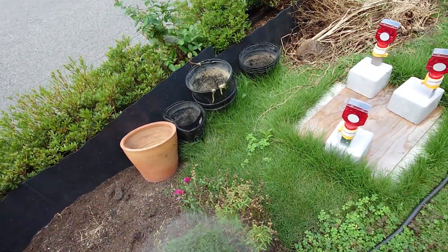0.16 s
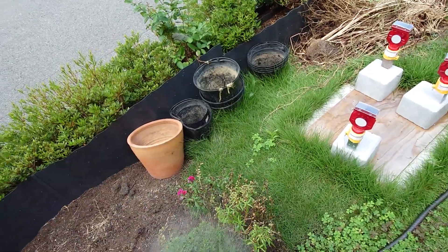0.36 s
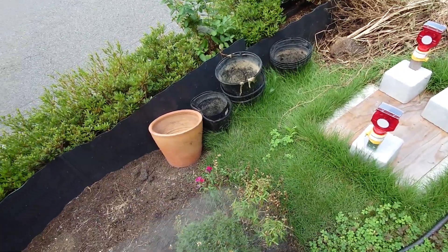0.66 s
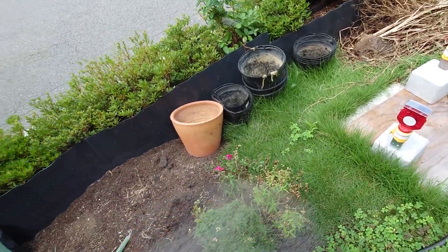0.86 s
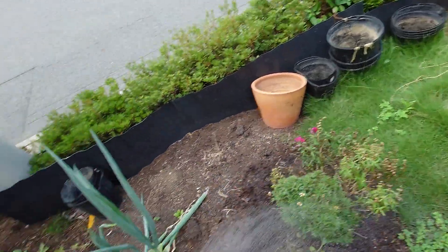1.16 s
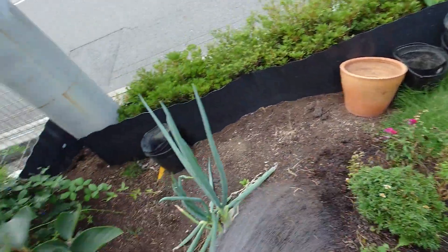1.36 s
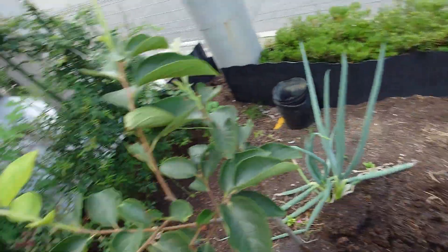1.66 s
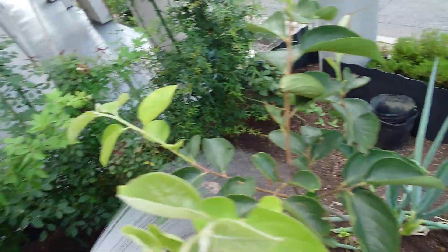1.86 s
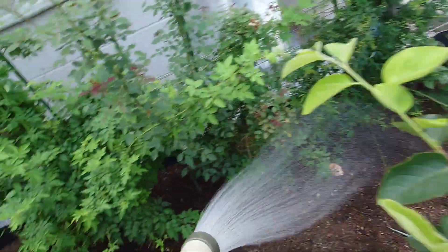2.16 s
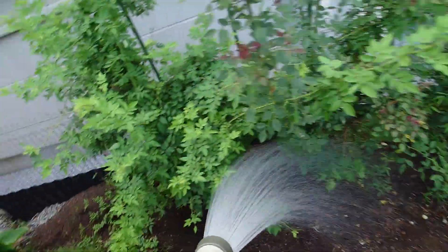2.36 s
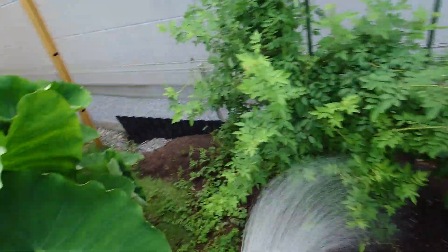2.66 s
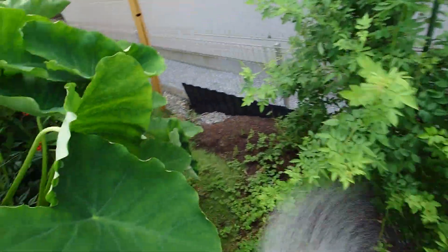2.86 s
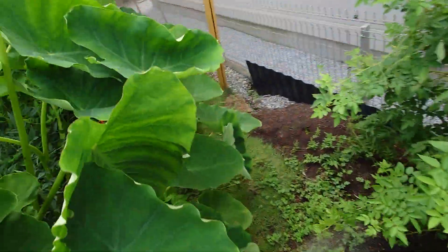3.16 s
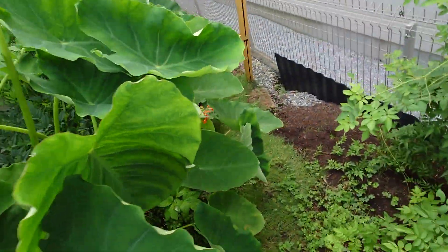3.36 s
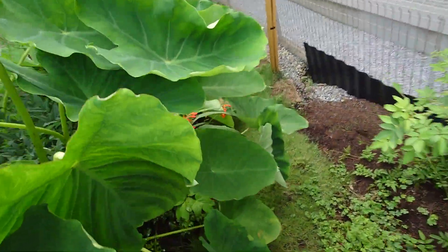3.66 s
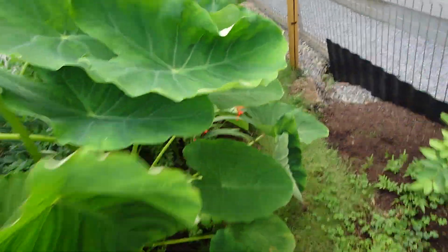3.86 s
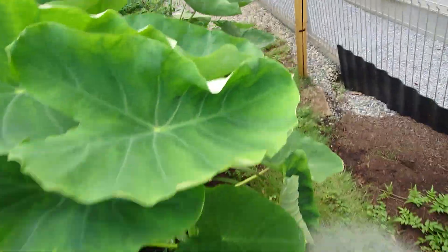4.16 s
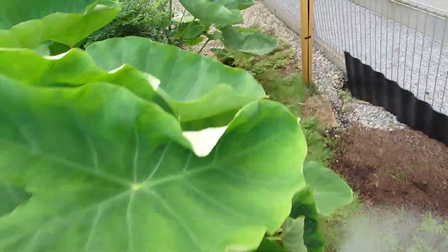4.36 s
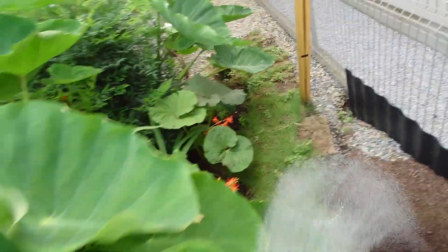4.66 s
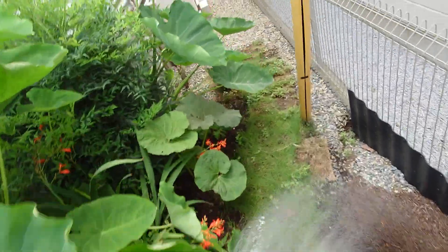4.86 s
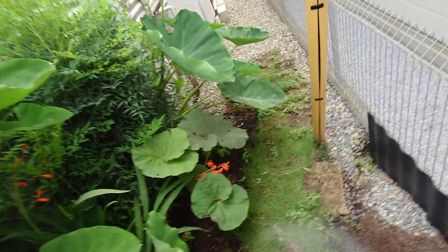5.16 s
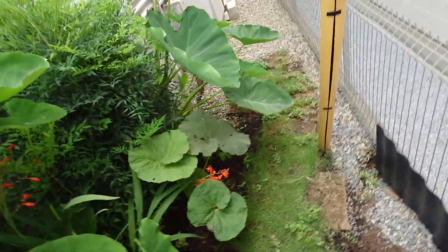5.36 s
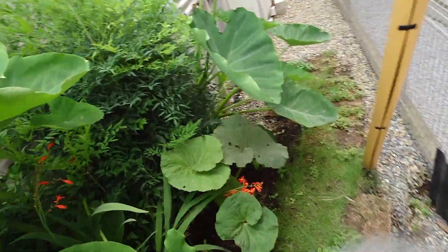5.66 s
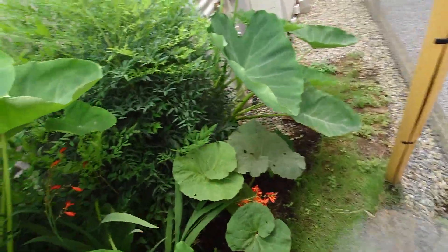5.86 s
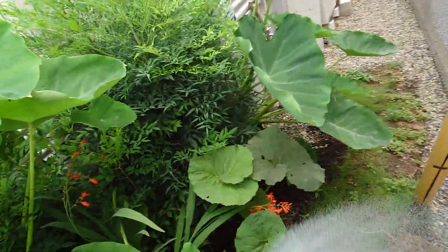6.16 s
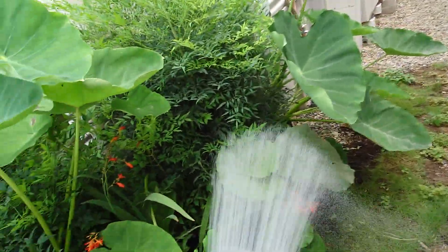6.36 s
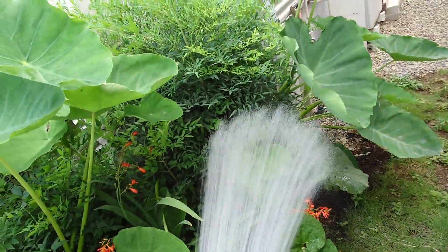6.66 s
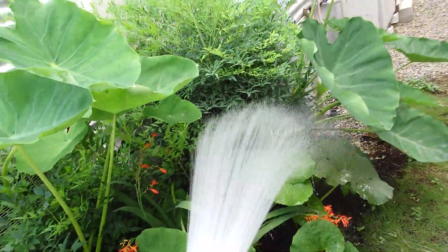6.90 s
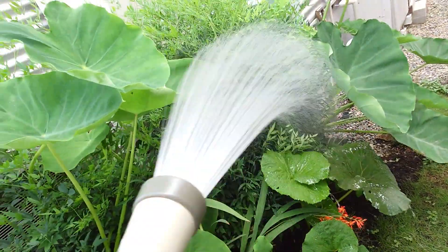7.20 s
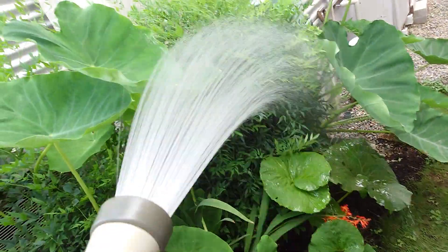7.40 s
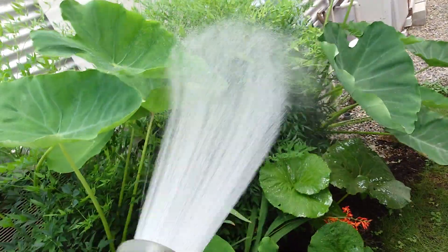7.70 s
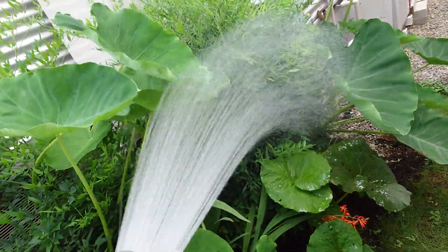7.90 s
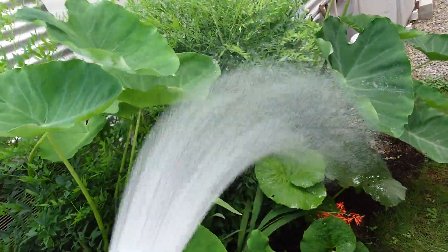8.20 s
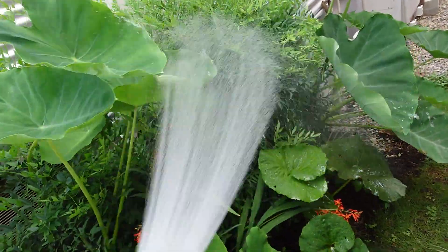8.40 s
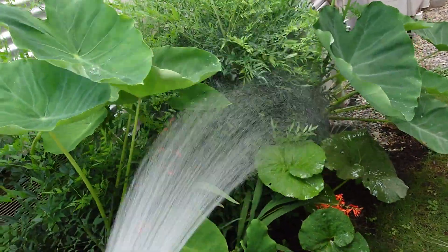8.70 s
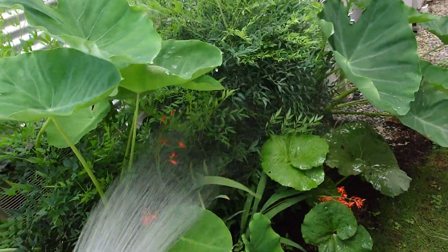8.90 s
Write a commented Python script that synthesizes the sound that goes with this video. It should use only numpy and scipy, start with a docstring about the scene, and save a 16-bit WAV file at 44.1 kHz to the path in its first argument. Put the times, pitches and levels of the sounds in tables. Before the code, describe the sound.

Water sprays from a hose onto soil and big leaves, whistling and drumming louder as it sweeps, while wind puffs and a bird chirps occasionally.

```python
"""A shower nozzle on a garden hose sweeps over soil and broad leaves, close to two microphone ports.
From the start the nozzle whistles and hisses, drops drum on soil and mist fizzes over far traffic; a bird
chirps now and then and fat drops tick. From 2 s wind puffs on the ports and low plops join in. From 3.4 s
the spray crosses the leaves in louder passes, and the wind slaps around 4 and 5 s. A faint hum then comes
and goes twice, and the mist is strongest at the end."""
import sys
import numpy as np
from scipy import signal
from scipy.fft import rfft, irfft, next_fast_len
from scipy.io import wavfile
from scipy.ndimage import uniform_filter1d

SR = 44100
rng = np.random.default_rng(int(sys.argv[2]) if len(sys.argv) > 2 else 0)


def waveform_to_disk(signal):
    """Save audio, clipped to [-1, 1], as 16-bit WAV at the path in sys.argv[1]."""
    frames = np.transpose(np.atleast_2d(signal))
    scaled = np.clip(frames, -1, 1) * 32767
    samples = np.round(scaled).astype(np.int16)
    wavfile.write(sys.argv[1], SR, samples)


N = 398663
CLOCK_S = np.arange(0, N / SR + .002, .002)  # control clock for all envelopes

# The low ring, near 1.1 kHz, swells and fades in the water drumming on the soil; the others shift as the
# hand turns the nozzle: time_s, main_ring_hz, low_ring_db, upper_ring_db, high_ring_db
RINGS = [(0, 2400, 11, 2, -1), (.5, 2370, 14, 8, -8), (.9, 2450, 7, 2, -6), (1.35, 2440, 9, 1, 4),
         (1.7, 2400, 6, 1, 3), (2, 2400, 12, 4.2, 5), (2.3, 2320, -10, 1, -4), (2.7, 2330, 10, 1, -7),
         (2.95, 2470, 3, 13, 4), (3.3, 2550, 0, 4.1, 8), (3.9, 2280, -10, 1, -1), (4.15, 2430, -4, 1, 5),
         (5.2, 2400, -0.5, 1, 2), (5.6, 2310, 2, 3, -1), (5.95, 2260, 6, 2.2, -2), (6.25, 2370, 1, 10, 6),
         (6.45, 2210, 4, 1, -6), (6.95, 2200, -9, 1, 4), (7.2, 2280, 0, 2, 0), (7.8, 2390, -9, 5.1, -3),
         (8.5, 2350, -1.5, 1, 3), (9.04, 2580, 0, 1, -10)]


def nozzle():
    """Turbulence in the shower head rings its chamber and hisses through the holes."""
    # Nozzle faders (pan is always left minus right): time_s, whistle_db, whistle_pan_db, hiss_db, hiss_pan_db
    faders = [(0, -52.5, -8, -58, 15), (.25, -48, -9.5, -52.5, 18), (1, -50, -8.5, -54, 17),
              (1.3, -49.5, -11, -54, 12.5), (1.8, -49, -10, -53.5, 10.5), (2.15, -52.5, -1, -51, 11),
              (2.59, -46.5, -4, -48, 12), (2.9, -50, -7.5, -52.5, 8.5), (3.5, -50, -5.5, -55, 4.5),
              (4.1, -47, -7, -50.5, 8), (4.35, -45.5, -10, -52, 7), (4.85, -43, -7.5, -48.5, 9),
              (5.15, -47, -6.5, -53, 7.5), (5.37, -46.5, -8, -53.5, 8), (5.76, -44.5, -11, -52.5, 7.5),
              (6.3, -45, -8.5, -51.5, 5.5), (6.5, -48.5, -11, -49, 7), (7.2, -48.5, -1.5, -48, 10),
              (7.85, -44.5, 0.5, -45.5, 11.5), (8.2, -52, -1, -49, 7), (8.35, -44, -7, -48, 9),
              (9.04, -46, -6, -47, 10.5)]
    # Chamber tone: frequency_hz, left_db, right_db
    whistle_eq = [(1090, -25, -35.5), (1940, 0, -4), (2220, -6, 0), (2350, 2, -1.5), (2580, 1, -3),
                  (2660, 3.5, -13.5), (3040, 0, -9), (3510, 0.5, -16.5), (3960, -31, -20.5),
                  (4860, -50, -66)]
    # Tone of the holes: frequency_hz, left_db, right_db
    hiss_eq = [(3180, -29, -32), (4600, -6, -23), (4880, -10, -8.5), (5230, 0, 2.5), (5370, -2.5, -17),
               (6200, 3, -13), (6410, 5, 3), (6530, 3, 3.5), (7456, 5, 1), (7940, -44, 3),
               (8460, -10, -5.5), (8550, -22, -4.5), (10060, -19, -22.5)]
    whistle_db, whistle_pan_db, hiss_db, hiss_pan_db = curves(faders)
    time_s, main_hz = np.transpose(RINGS)[:2]

    def chamber_db(hz, t):
        detune_hz = hz[:, None] - np.interp(t, time_s, main_hz)
        return 7.5 * np.exp(-(detune_hz / 140) ** 2) + side_rings(hz, t)

    whistle = coloured(noise(), whistle_eq, (2100, 2700), 0.84, chamber_db, bearing="nozzle")
    hiss = coloured(noise(), hiss_eq, (5000, 7500), 1.08, side_rings, bearing="nozzle")
    whistle *= to_samples(placed(whistle_db - 6.5, whistle_pan_db) * surge("whistle") * waver(1.43, 12))
    hiss *= to_samples(placed(hiss_db, hiss_pan_db) * surge("hiss") * waver(0.95, 12))
    return whistle + hiss


def leaves():
    """Dense drops drum on soil and leaves; large leaves add bass."""
    # Spray on soil and small plants: time_s, level_db, pan_db, bass_db
    soil = [(0, -64, 2, 8), (.5, -61.5, -1, 2.5), (1.05, -58, 0, -1), (1.35, -62.5, -2.5, 4.5),
            (1.8, -70.5, -2, 21), (2.15, -63, -4, 8), (2.7, -63.5, -2.5, 7.5), (3.2, -60.5, -1.5, 2),
            (4.3, -59.5, -4, 2.5), (5.3, -62, -1.5, 17.5), (5.7, -54, -2.5, 0.5), (6, -51.5, -4.5, -1.5),
            (6.3, -55, -3, -5), (7.3, -54.5, -4.5, -3.5), (8, -56, -4, 6.5), (9.04, -54, -1, -7)]
    # Spray crossing broad leaves: start_s, end_s, start_db, end_db, pan_db, rise_s, fall_s, bass_db
    passes = [(3.386, 3.504, -47.5, -48.5, -2.5, 0.11, 0.083, 1),
              (3.714, 3.873, -44.5, -45.5, -3.5, 0.15, .03, -1),
              (3.902, 3.994, -41.5, -44, -3, .02, 0.24, 0.5),
              (4.582, 4.762, -47.5, -48, -3.5, 0.085, .05, -4.5),
              (4.81, 5.04, -44.5, -45, -3.5, 0.075, 0.17, -6),
              (6.385, 6.55, -46, -47, -2.5, 0.035, 0.059, -5), (6.592, 7, -44, -45, -2.5, 0.055, 0.27, 0),
              (7.55, 7.803, -48.5, -47, -3, 0.23, .03, -4.5), (7.83, 7.892, -49, -50.5, 2, .03, 0.04, 5),
              (8.057, 8.144, -49.5, -48.5, -1, 0.062, 0.066, 0),
              (8.277, 8.59, -47.5, -47.5, -1, 0.055, 0.072, -3.5),
              (8.71, 8.923, -50, -49.5, -3.5, .04, .03, 1.5),
              (8.98, 9.1, -43, -43.5, -1.5, 0.075, .05, 8.5)]
    # Tone of the drumming: frequency_hz, left_db, right_db
    drum_eq = [(196, -68, -72.5), (326, -9, -14), (520, -8, -10.5), (970, -2, -3.5), (1534, -2.5, 3),
               (1990, -6.5, 0), (2640, -8.5, -7.5), (3800, -12.5, -15.5), (6040, -18, -28),
               (9000, -25, -25.5)]
    soil_db, pan_db, soil_bass_db = curves(soil)
    powers = [placed(soil_db, pan_db) ** 2] + [swell(*row[:-1]) for row in passes]
    basses_db = [soil_bass_db] + [row[-1] for row in passes]
    # The loudest surface has the most say in the bass.
    bass_db = sum(db * power.sum(0) for db, power in zip(basses_db, powers)) / sum(powers).sum(0)

    def body_db(hz, t):
        return np.interp(t, CLOCK_S, bass_db) / (1 + (hz[:, None] / 800) ** 2) + side_rings(hz, t)

    level = to_samples(np.sqrt(sum(powers)) * waver(1.0, 14))
    impacts = drops(per_s=5000, spread_db=1.76)
    return level * coloured(impacts, drum_eq, (400, 1700), 1.15, body_db, bearing="water")


def mist():
    """Very many tiny droplets burst into a fizz."""
    # Mist fader: time_s, level_db, pan_db
    fader = [(0, -67, 0), (1.1, -66, -4), (1.26, -63, 0), (1.5, -69, -4), (1.9, -65.5, -3),
             (2.2, -72.5, -10), (2.54, -62.5, -4), (3, -64, -3), (3.45, -61.5, -5), (3.7, -58.5, 0),
             (4.1, -58.5, -1), (4.35, -63, -9), (4.85, -60.5, 0), (5.1, -58.5, -1), (5.3, -63.5, -2),
             (5.6, -64.5, -2), (6.2, -65.5, -13), (6.65, -64, 3), (6.85, -64.5, 2), (7.1, -56.5, 0),
             (7.4, -61.5, 1), (7.55, -58, 2), (8.2, -57.5, 1), (8.4, -60.5, 0), (9.04, -53.5, 0.5)]
    # Tone of the fizz: frequency_hz, left_db, right_db
    fizz_eq = [(2340, -13, 0), (4030, 10, 14.5), (6000, 7.5, 5.5), (9000, -8, -35), (9630, -4, -1),
               (10400, 1.5, 8.5), (13100, 4, 7), (16500, -8, 8)]
    level = to_samples(placed(*curves(fader)) * surge("fizz") * waver(1.53, 15))
    return level * coloured(drops(per_s=15000, spread_db=2.5), fizz_eq, (10500, 15500), .9)


def fat_drops():
    """Single drops tick with a short double ring, or plop low, soft and longer."""
    # Sharp drops: start_s, level_db, pitch_hz, pan_db, lower_octave_share
    ticks = [(.7948, -36.5, 2000, -8, .3), (.9108, -34, 2300, -12, .12), (.9208, -39, 2300, -12, .05),
             (1.0222, -32.5, 1900, -7, .35), (2.107, -38, 1900, -5, .25), (4.248, -38, 3900, -6, .1),
             (5.3508, -32, 1700, -8, .3)]
    # Soft drops: start_s, level_db, pitch_hz, pan_db
    plops = [(2.064, -54, 400, 6), (2.45, -50, 610, 11), (3.14, -48, 497, -3), (3.946, -41, 440, -3),
             (4.253, -47.5, 568, -5.0), (5.785, -47, 395, -2.0)]
    out, t = np.zeros((2, N)), np.arange(2000) / SR
    low_cut = signal.butter(2, 600, "high", fs=SR)
    for start_s, db, hz, pan_db, lower_share in ticks:
        ring = np.exp(-t / .0009) * np.sin(2 * np.pi * hz * t)
        lower_ring = lower_share * np.exp(-t / .002) * np.sin(np.pi * hz * t)
        attack = 1 - np.exp(-t / .0005)
        tick = signal.lfilter(*low_cut, 2.8 * (ring + lower_ring) * attack)
        add(out, start_s, panned(db, pan_db) * tick)
    for start_s, db, hz, pan_db in plops:
        cycles = t * hz
        envelope = (cycles / 1.86 * np.exp(1 - cycles / 1.88)) ** 2
        add(out, start_s, panned(db, pan_db) * envelope * np.sin(2 * np.pi * cycles))
    return out


def wind():
    """Lumpy wind, unrelated at the two ports and brighter when strong."""
    # Breeze on the ports: time_s, level_db, pan_db
    breeze = [(0, -82.5, 7), (1.5, -80.5, 5), (1.7, -71, 13), (2.1, -65.5, 15), (2.5, -64.5, -4),
              (3, -74, -7), (3.5, -69.5, 7), (4.4, -61.5, 5), (5.1, -71, -9), (5.6, -73, 5),
              (6.15, -65, -12), (6.26, -78, 0), (7.5, -84, 0), (8, -74, -8), (8.3, -79, 3), (9.04, -77, -3)]
    # Puffs on top of it: start_s, end_s, start_db, end_db, pan_db
    gusts = [(2.11, 2.158, -59, -59, 23), (2.38, 2.46, -65, -68, 4), (2.762, 2.854, -61, -62, -28),
             (3.253, 3.285, -58, -61, 20), (3.89, 3.91, -61, -64, 19), (3.974, 4, -58, -59, -12),
             (4.07, 4.3, -54, -52, -16), (4.42, 4.533, -58.5, -54.5, -6), (4.593, 4.78, -61, -55.5, -23),
             (4.92, 4.94, -57, -61, -20), (5.01, 5.06, -60, -62, -17), (5.232, 5.26, -58, -57, -6),
             (5.353, 5.38, -54, -59, -17), (5.84, 5.967, -60, -59, -22), (6.06, 6.174, -64, -60, -19),
             (7.94, 8.07, -69, -69, -12), (8.15, 8.192, -65, -64, -15)]
    # Tone of the buffeting: frequency_hz, left_db, right_db
    wind_eq = [(15, 7.5, 11.5), (44.6, -8.5, 13.5), (80, -8, -2), (122, -21, 5), (198, -38, -37),
               (400, -29.5, -37)]
    power = placed(*curves(breeze)) ** 2 + sum(swell(*row, rise_s=.026, fall_s=.05) for row in gusts)
    wind_db = 10 * np.log10(power.sum(0) / 4)
    lumps = gain_of(2.9 * unit_rms(uniform_filter1d(noise(), size=1500)))

    def shelf_db(hz, t):
        return 1.1 * (np.interp(t, CLOCK_S, wind_db) + 52.5) / (1 + (110 / (hz[:, None] + 1)) ** 4)

    buffeting = coloured(noise(), wind_eq, (25, 150), 0.14, shelf_db, apart=True, size=2048)
    return to_samples(np.sqrt(power)) * lumps * buffeting


def wind_slaps():
    """Each slap is one quick push and pull of air on a port."""
    # Single slaps: start_s, level_db, pitch_hz, pan_db
    slaps = [(4.083, -55, 150, -10), (4.181, -52, 119, -14), (4.239, -50, 170, -14), (5.236, -53, 149, -2)]
    out, t = np.zeros((2, N)), np.arange(1500) / SR
    for start_s, db, hz, pan_db in slaps:
        push = np.exp(-((t * hz - 1) / .6) ** 2) * np.sin(2 * np.pi * hz * t)
        add(out, start_s, panned(db, pan_db) * push)
    return out


def bird():
    """A high note falls into a lower, burred one; leaves and walls scatter the call."""
    # Calls: start_s, high_note_db, low_note_db, pitch_factor
    chirps = [(-.012, -44, -45, 1.01), (1.335, -45, -43.5, 0.98), (3.567, -40.5, -43, .995),
              (5.147, -40, -45, 1.02)]
    # Glide of a call: time_s, pitch_hz
    glide = [(0, 4680), (.006, 4560), (.024, 4520), (.031, 3520), (.042, 3720), (.06, 3640), (.08, 3500)]
    out, t = np.zeros((2, N)), np.arange(round(.09 * SR)) / SR
    high_note = np.exp(-((t - .013) / .01) ** 2)
    low_note = np.exp(-((t - .053) / .021) ** 4)
    echo_t = t[:1500]
    for start_s, high_db, low_db, pitch_factor in chirps:
        tremble = unit_rms(uniform_filter1d(rng.standard_normal(len(t)), size=70))
        hz = pitch_factor * np.interp(t, *np.transpose(glide)) + (90 + 120 * low_note) * tremble
        envelope = gain_of(high_db) * high_note + gain_of(low_db) * low_note
        call = envelope * np.sin(2 * np.pi * np.cumsum(hz) / SR)
        scatter = np.exp(-echo_t / 0.02) * rng.standard_normal((2, len(echo_t)))
        garden = (echo_t == 0) + 0.7 * scatter / np.linalg.norm(scatter[0])  # direct sound plus tail
        add(out, start_s, panned(0, pan_db=3) * signal.fftconvolve(call[None], garden, axes=1))
    return out


def traffic():
    """Distant traffic lays a low rumble under the garden."""
    # Traffic fader: time_s, level_db
    fader = [(0, -73), (1.2, -73.5), (1.7, -68), (2.3, -69), (2.8, -74), (6, -73), (6.8, -71), (8.2, -74),
             (9.04, -70)]
    # Tone of the rumble: frequency_hz, left_db, right_db
    rumble_eq = [(30, -8, 1), (73, 7, -0.5), (119, 5.5, 3), (170, 6, -5.5), (247, -6.5, -12.5),
                 (436, -10, -10.5), (1200, -34, -71)]
    return to_samples(gain_of(curves(fader))) * coloured(noise(), rumble_eq, (25, 150), 0.4, size=4096)


def hum():
    """A faint steady tone fades in and out at the centre."""
    # Spells of hum: start_s, end_s, pitch_hz, level_db
    spells = [(4.948, 6.165, 587, -66.5), (7.098, 7.7, 590, -66)]
    out = np.zeros((2, N))
    for start_s, end_s, hz, db in spells:
        t = np.arange(0, end_s - start_s, 1 / SR)
        tone = np.sqrt(2) * np.sin(2 * np.pi * hz * t) * signal.windows.tukey(len(t), .3)
        add(out, start_s, panned(db, pan_db=0) * tone)
    return out


def side_rings(hz, t):
    """Boost or cut in dB as three rings, near 1.1, 3.1 and 5.25 kHz, swell and fade; used in the drumming, the
    whistle and the hiss alike."""
    ring_hz, width_hz = (1076, 3095, 5250), (64, 106, 240)
    time_s, _, *boosts_db = np.transpose(RINGS)
    return sum(np.interp(t, time_s, db) * np.exp(-((hz[:, None] - centre) / width) ** 2)
               for db, centre, width in zip(boosts_db, ring_hz, width_hz))


def surge(layer):
    """Gain of one layer as the spray briefly swells or dips."""
    # Swells and dips: start_s, length_s, fall_s, whistle_db, hiss_db, fizz_db
    surges = [(3.891, .075, .06, 8, 4.5, 5), (4.15, .008, .015, -2, 1, 5), (4.23, .008, .01, 0.5, 2, 5),
              (4.3, .004, .008, 1, 0, 4), (4.497, .004, .012, 3.5, 5, 3), (4.628, .004, .008, 3, 2, 5),
              (5.178, .02, .04, 2.5, 2, 6.5), (5.315, 0.07, 0.057, -4.5, 0.5, 2),
              (6.335, 0.024, 0.022, -3, -3, 0), (6.754, 0.036, 0.046, 1, 2, -6),
              (8.744, .05, .05, 3, 0.5, -0.5), (8.95, .03, .05, 1.5, 2, 2)]
    column = ("whistle", "hiss", "fizz").index(layer)
    return gain_of(sum(layers_db[column] * held(start_s, start_s + length_s, .0066, fall_s)
                       for start_s, length_s, fall_s, *layers_db in surges))


def drops(per_s, spread_db):
    """Two trains of clicks with random sign; a few are large."""
    size = gain_of(spread_db * np.minimum(rng.exponential(1, (2, N)), 5))
    return unit_rms(size * rng.choice([-1., 1.], (2, N)) * (rng.random((2, N)) < per_s / SR))


def coloured(source, eq, band_hz, patchy_db, extra_db=None, bearing=None, apart=False, size=512):
    """Gives two signals a stereo image, an EQ levelled on band_hz and drifting patches of colour."""
    # How the two ports hear one source: frequency_hz, likeness (0-1), left_lead_rad
    ports = [(58.6, 0.82, 0.32), (254, 1, -0.98), (590, 0.71, 0.74), (980, 0.67, -1.28),
             (1310, 0.39, -1.77), (1930, 0.57, -0.55), (2400, 0.69, 0.79), (2980, 0.35, 0.39),
             (3530, 0.28, 0.056), (5060, 0.28, 1), (6500, 0.02, 1), (9000, 0, 0.83)]
    # Direction of landing water and nozzle: time_s, water_left_lead_ms, nozzle_left_lead_ms, likeness_factor
    bearings = [(0, 0.21, 0.18, 1.06), (1.5, 0.16, 0.16, 1.15), (2, .05, 0.23, 0.75),
                (3.1, 0.027, -0.09, 0.73), (3.4, .001, 0.03, 0.99), (6.3, .001, -0.019, 0.86),
                (6.6, 0.036, -0.17, 1.04), (9.04, 0.083, -0.16, 0.95)]
    frames = dict(fs=SR, nperseg=size, noverlap=size * 3 // 4)
    hz, t, (left, other) = signal.stft(source, **frames)
    likeness, lead_rad = over_frequency(ports, hz)[:, :, None]
    if bearing:
        time_s, water_ms, nozzle_ms, likeness_factor = np.transpose(bearings)
        lead_ms = np.interp(t, time_s, {"water": water_ms, "nozzle": nozzle_ms}[bearing])
        lead_rad = lead_rad + 2 * np.pi * hz[:, None] * lead_ms / 1000
        likeness = likeness * np.interp(t, time_s, likeness_factor)
    likeness = 0 if apart else np.clip(likeness, 0, 1)
    right = likeness * left * np.exp(-1j * lead_rad) + np.sqrt(1 - likeness ** 2) * other
    gain = gain_of(over_frequency(eq, hz))
    in_band = (hz >= band_hz[0]) & (hz <= band_hz[1])
    gain /= np.sqrt((gain[:, in_band] ** 2).sum(1, keepdims=True) / len(hz))
    blots, streaks = rng.standard_normal(left.shape[::-1] + (2,)).T
    blots = uniform_filter1d(uniform_filter1d(blots, 5, axis=0), 20, axis=1)  # short and wide
    streaks = uniform_filter1d(uniform_filter1d(streaks, 2, axis=0), 120, axis=1)  # long and narrow
    drift_db = patchy_db * (unit_rms(blots) + 2.23 * unit_rms(streaks))
    if extra_db:
        drift_db += extra_db(hz, t)
    return signal.istft(np.array([left, right]) * gain[:, :, None] * gain_of(drift_db), **frames)[1][:, :N]


def waver(depth_db, top_hz):
    """Slow random gain, mostly shared by the two ports."""
    hz, phase = np.geomspace(.7, top_hz, num=30)[:, None], rng.random((3, 30, 1))
    shared, *sides = (np.sin(2 * np.pi * (hz * CLOCK_S + phase)) / hz ** 0.4).sum(1)
    return gain_of([depth_db * unit_rms(shared + 0.41 * side) for side in sides])


def swell(start_s, end_s, start_db, end_db, pan_db, rise_s, fall_s):
    """Left and right power of one held event."""
    db = np.interp(CLOCK_S, [start_s, end_s], [start_db, end_db])
    return (placed(db, [pan_db]) * held(start_s, end_s, rise_s, fall_s)) ** 2


def held(start_s, end_s, rise_s, fall_s):
    """Attack, hold and release, 0 to 1."""
    return np.interp(CLOCK_S, [start_s - rise_s, start_s, end_s, end_s + fall_s], [0, 1, 1, 0])


def placed(db, pan_db):
    """Left and right gains with constant-power panning."""
    ratio = gain_of(pan_db) ** 2
    return 2 * gain_of(db) * np.sqrt(np.array([ratio, np.ones_like(ratio)]) / (1 + ratio))


def panned(db, pan_db):
    """Left and right gains of a one-shot, half the pan to each side."""
    return gain_of([[db + pan_db / 2], [db - pan_db / 2]])


def noise():
    """Two unrelated white noises."""
    return rng.standard_normal((2, N))


def gain_of(db):
    """Decibels to a factor."""
    return 10 ** (np.asarray(db) / 20)


def unit_rms(x):
    """Scales to rms 1."""
    return x / np.sqrt(np.mean(abs(x) ** 2) + 1e-20)


def over_frequency(table, hz):
    """Each column of a table on a log-frequency axis."""
    points_hz, *columns = np.transpose(table)
    return np.array([np.interp(np.log(hz + 1), np.log(points_hz + 1), column) for column in columns])


def curves(table):
    """Each column of a time table on the control clock."""
    time_s, *columns = np.transpose(table)
    return [np.interp(CLOCK_S, time_s, column) for column in columns]


def to_samples(gains):
    """Gains from the control clock to audio rate."""
    return np.array([np.interp(np.arange(N) / SR, CLOCK_S, gain) for gain in gains])


def add(mix, start_s, sound):
    """Mixes a stereo sound in, trimmed at both ends of the mix."""
    at = round(start_s * SR)
    sound = sound[:, max(-at, 0):]
    part = mix[:, max(at, 0):][:, :sound.shape[1]]
    part += sound[:, :part.shape[1]]


def scene():
    """The spray and the garden around it."""
    water = leaves() + nozzle() + mist() + fat_drops()
    return water + wind() + wind_slaps() + traffic() + bird() + hum()


def record(dry):
    """The left channel has a deep treble gap from about 7.7 to 10 kHz; both get a steep high cut."""
    # Treble gap in the left channel: frequency_hz, gain_db
    notch = [(7300, -3.5), (7650, -10), (7900, -41), (9300, -41), (9900, -0.5), (10400, -3.5)]
    size = next_fast_len(N)
    notch_gain = gain_of(over_frequency(notch, np.fft.rfftfreq(size, 1 / SR))[0])
    left = irfft(rfft(dry[0], size) * notch_gain, size)[:N]
    high_cut = signal.firwin(511, cutoff=15800, window=("kaiser", 9), fs=SR)
    return signal.oaconvolve(np.array([left, dry[1]]), high_cut[None], "same")


dry = scene()
out = record(dry)
waveform_to_disk(out)
```